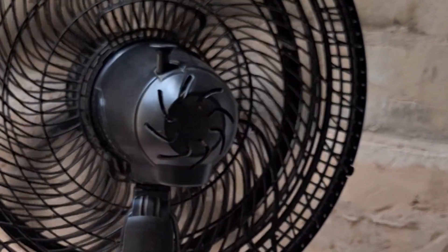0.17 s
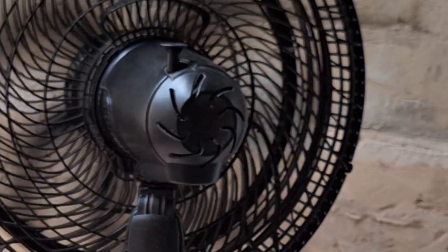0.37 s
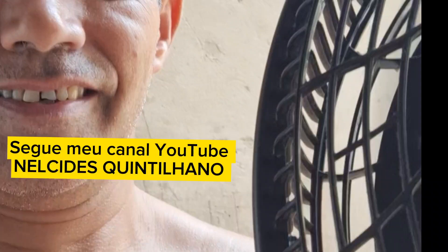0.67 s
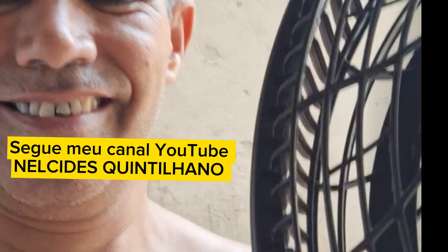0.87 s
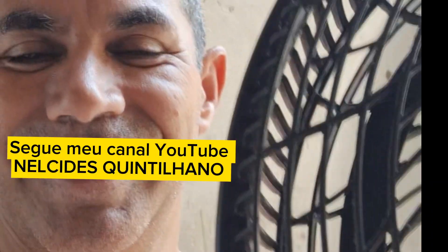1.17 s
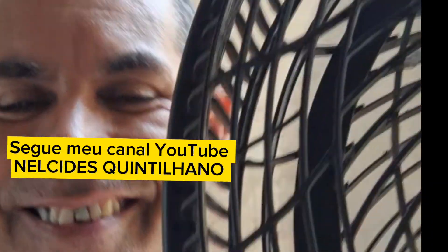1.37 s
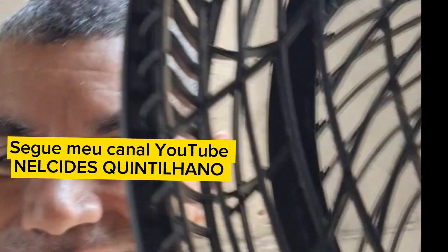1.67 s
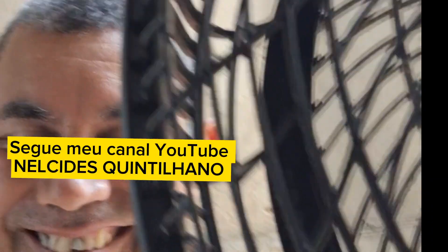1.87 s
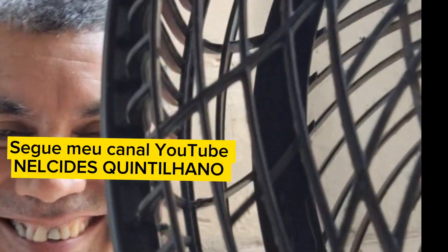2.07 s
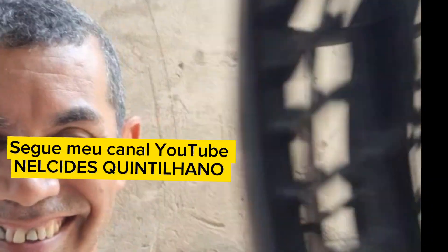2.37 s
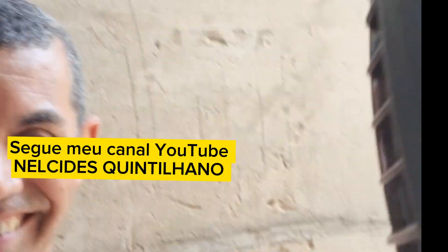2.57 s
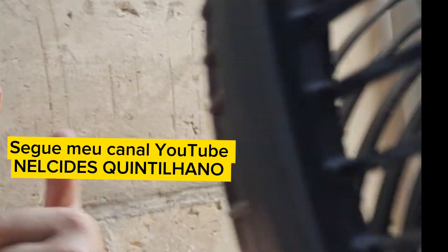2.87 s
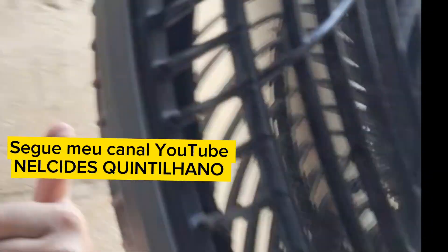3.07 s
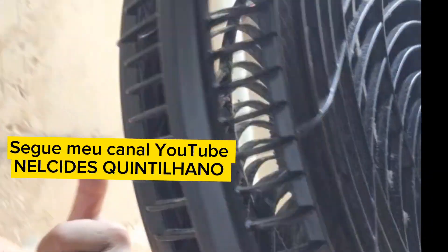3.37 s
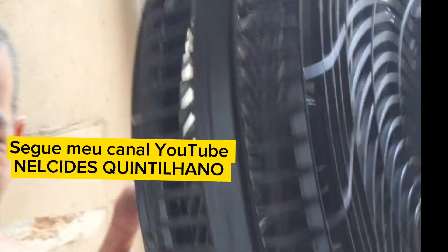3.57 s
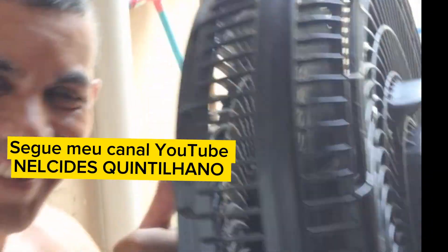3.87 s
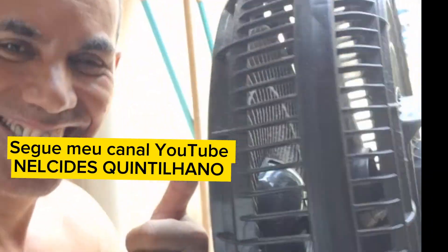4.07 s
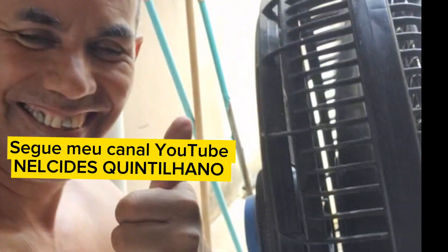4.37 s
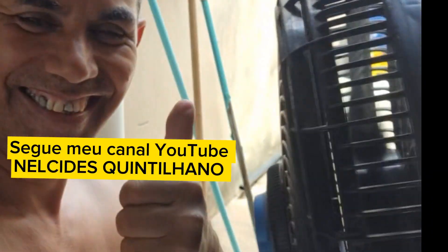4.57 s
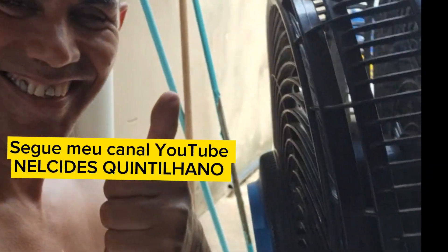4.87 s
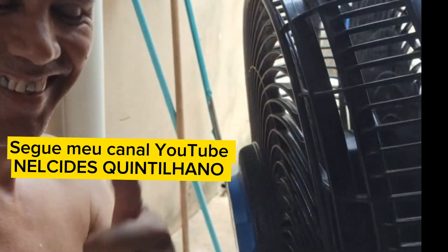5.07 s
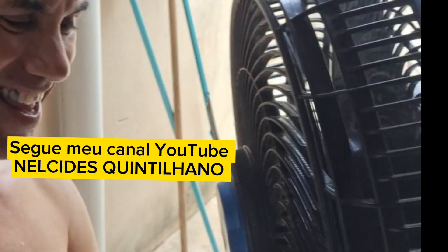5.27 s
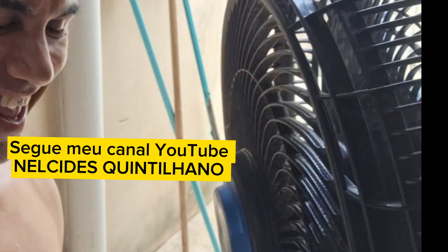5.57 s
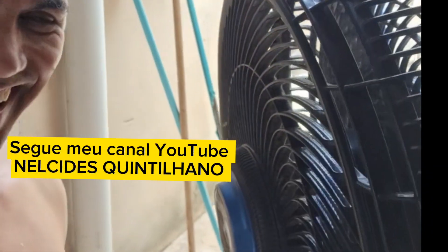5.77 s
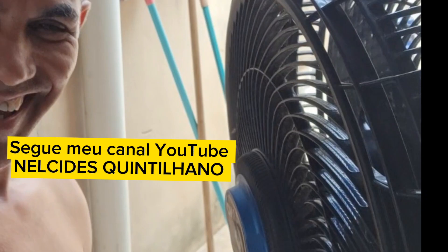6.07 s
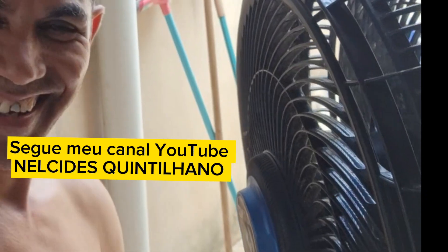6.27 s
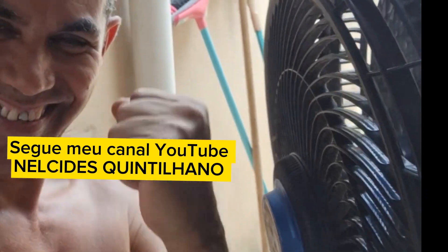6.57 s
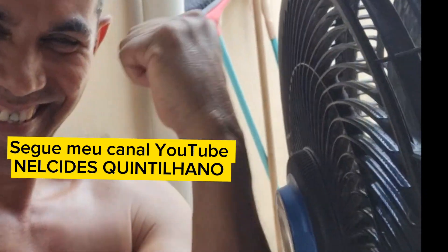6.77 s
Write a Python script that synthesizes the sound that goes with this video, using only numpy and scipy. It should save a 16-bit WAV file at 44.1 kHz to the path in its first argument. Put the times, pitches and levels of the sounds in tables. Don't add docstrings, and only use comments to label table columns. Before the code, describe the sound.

Very close to a running electric fan in a hard-walled space, handheld phone microphone. First the motor side: deep, beating hum and dull rushing air. It cuts dead at about 0.66 seconds, stays silent for a third of a second, then returns louder, with heavy low throb, wind buffeting the microphone and unsteady gain. As the cage turns toward the phone, the hum weakens and the air rush becomes more open and steady.

```python
import sys
import numpy as np
from scipy import signal
from scipy.fft import rfft, irfft, next_fast_len
from scipy.io import wavfile
from scipy.ndimage import uniform_filter1d, minimum_filter1d, map_coordinates

SR = 44100
rng = np.random.default_rng(int(sys.argv[2]) if len(sys.argv) > 2 else 0)


def gain_from_decibels(decibels):
    exponent = np.asarray(decibels, float) / 20
    return 10 ** exponent


def log_audio(samples):
    frames = np.atleast_2d(samples).T
    limited = np.clip(frames, -1, 1)
    pcm = np.round(limited * 32767).astype(np.int16)
    wavfile.write(sys.argv[1], SR, pcm)


N = 304731
CUT_S, BACK_S = 0.65784, 0.9665
SHAFT_HZ, BLADE_COUNT = 19.01, 6


def unit(x):
    return x / np.sqrt(np.mean(x ** 2) + 1e-20)


def along(points, hz):
    f, v = np.transpose(points)
    return np.interp(np.log(hz + 1), np.log(f + 1), v)


def curves(rows):
    s, *cols = np.transpose(rows)
    return [np.interp(np.arange(N) / SR, s, c) for c in cols]


def wobble(rate_hz):
    knots = rng.standard_normal(int(N * rate_hz / SR) + 4)
    return map_coordinates(knots, [np.arange(N) * rate_hz / SR])


def filtered(x, response):
    m = next_fast_len(N + 8192)
    return irfft(rfft(x, m) * response(np.fft.rfftfreq(m, 1 / SR)), m)[..., :N]


def sides(lean_db):
    return gain_from_decibels(np.array([lean_db, -lean_db]) / 2)


def blend(pair, alike):
    turn = np.arccos(np.clip(alike, -1, 1)) / 2
    return np.cos(turn) * pair[0] + np.sin(turn) * pair[1] * [[1], [-1]]


def dips(rows, fall_s, recover_s):
    coarse = np.arange(0, N, 64)
    lag_s = coarse[:, None] / SR - np.array(rows)[:, 0]
    shape = np.exp(-(lag_s / np.where(lag_s < 0, fall_s, recover_s)) ** 2)
    return np.interp(np.arange(N), coarse, -shape @ np.array(rows)[:, 1])


# t/s, grip of stand shake level/dB, level with rim [0-1], air flow level/dB,
# port buffeting level/dB
PHONE_PLACE = [(0.05, -13, 0, -35, -20), (0.62, -10, 0, -35, -20.5), (1.05, -6, 0.23, -34, -18.5),
               (1.5, -6.5, 0.31, -34.5, -18.5), (2.06, -6.5, 0.43, -36.5, -16.5),
               (2.4, -7.5, 0.69, -37, -18), (2.7, -12, 1, -39, -21.5), (3.0, -6.5, 0.74, -37, -19.5),
               (3.3, -10, 0.53, -36, -21.5), (3.6, -7, .25, -37, -23.5), (3.86, -9.5, 0.3, -36.5, -25.5),
               (4.0, -17.5, 0.15, -36.5, -25), (4.5, -23, .05, -35.5, -25), (5.25, -21.5, .05, -34, -25),
               (5.55, -16, 0, -33, -24.5), (5.9, -20, .05, -33.5, -21), (6.1, -16, 0, -33.5, -24),
               (6.7, -14.5, 0, -33, -21)]


def phone_place():
    return curves(PHONE_PLACE)


# t/s, share of front colour [0-1]
SWIVEL = [
    (3.2, 0.015),
    (4.4, 1),
]


def front_share():
    return curves(SWIVEL)[0]


# t/s, depth level/dB, half length/s
SWING_LULLS = [(0.136, 9, 0.018), (0.313, 16, 0.021), (0.405, 18, 0.021), (0.56, 12, .04),
               (1.088, 5.5, .03), (1.257, 3.5, 0.035), (1.457, 7, 0.026), (1.67, 4, .06), (1.933, 8, 0.062),
               (2.147, 3, 0.035), (2.452, 15, 0.027), (2.558, 7, 0.025), (2.744, 4, 0.036),
               (2.926, 6.5, .05), (3.071, 8.5, 0.037), (3.166, 4, .03), (3.37, 2.5, .04),
               (4.253, 10, 0.043), (4.453, 9, 0.056), (4.63, 10, 0.052), (4.835, 14, 0.047),
               (5.047, 7, .03), (5.358, 6, 0.071), (5.675, 4, 0.055), (5.95, 14, 0.051), (6.165, 11, 0.042),
               (6.286, 6, .04), (6.442, 15, 0.045), (6.654, 12, 0.043), (6.88, 13, .03)]


def lulls():
    half_s = np.array(SWING_LULLS)[:, 2]
    return dips(SWING_LULLS, half_s, half_s)


def bass_lean():
    return 1 + 8.5 * phone_place()[1] - 0.3 * front_share()


HUM_HZ, HUM_BEHIND_HZ, RIM_SAG_HZ, HUM_DRIFT_HZ = 100.64, 102.8, 5.07, 1.21
HUM_LEAD_RAD, SHAKE_DB, FRONT_SHAKE_DB = 0.22, -20, 3.5


def hum():
    grip_db, rim = phone_place()[:2]
    size = gain_from_decibels(grip_db + lulls())
    base_hz = np.where(np.arange(N) < BACK_S * SR, HUM_BEHIND_HZ, HUM_HZ)
    hz = base_hz - RIM_SAG_HZ * rim ** 4 + HUM_DRIFT_HZ * wobble(9)
    phase = 2 * np.pi * np.cumsum(hz) / SR
    phase -= phase[round(CUT_S * SR)]
    shake = np.array([wobble(25) + 1j * wobble(29) for side in (0, 1)])
    swing = 1 + gain_from_decibels(SHAKE_DB + FRONT_SHAKE_DB * front_share()) * shake
    ports = sides(bass_lean())
    ports = ports / np.sqrt(np.mean(ports ** 2, 0))
    lead = HUM_LEAD_RAD * np.array([[-0.5], [0.5]])
    return np.sqrt(2) * size * ports * (swing * np.exp(1j * (phase + lead))).real


BLADE_BEHIND_DB, BLADE_BEHIND_FADE_DB_PER_S = -15.5, 24
BLADE_DB, BLADE_GRIP, BLADE_RIM_DB = -22.5, 0.47, 11
SURGE = 0.26
# multiple of shaft speed, level/dB, left-right level/dB
ORDERS = [(3, -40, -5), (12, -33, -1.5), (18, -45, 0), (22, -32.5, 8.5), (28, -39, -2), (42, -35.5, -0.5)]


def blades():
    grip_db, rim = phone_place()[:2]
    t = np.arange(N) / SR
    behind_db = BLADE_BEHIND_DB - BLADE_BEHIND_FADE_DB_PER_S * t
    near_db = BLADE_DB + BLADE_GRIP * grip_db + BLADE_RIM_DB * rim
    db = np.where(t < BACK_S, behind_db, near_db)
    lean_db = 2.5 + 6.5 * rim
    lead_rad = -0.23 - 3 * rim
    turns = 2 * np.pi * np.cumsum(SHAFT_HZ * (1 + 0.00099 * wobble(2.256))) / SR
    turns -= turns[round(CUT_S * SR)]
    tone = np.cos(BLADE_COUNT * turns - lead_rad * [[0], [1]])
    passing = gain_from_decibels(db + 1.1 * wobble(8.1)) * sides(lean_db) * tone
    orders = np.zeros((2, N))
    surge_db = SURGE * lulls()
    for multiple, level_db, order_lean_db in ORDERS:
        gain = gain_from_decibels(level_db + surge_db + 2.0 * wobble(4.6))
        order = np.cos(round(multiple) * turns + 0.32 * wobble(4.6))
        orders += gain * sides(order_lean_db)[:, None] * order
    return np.sqrt(2) * (passing + gain_from_decibels(-12 * (1 - front_share())) * orders)


def patchy(patchy_db):
    z = signal.stft(rng.standard_normal((2, N + 512)), nperseg=512)[2]
    field = uniform_filter1d(rng.standard_normal(z.shape[1:]), size=8, axis=0)
    field = uniform_filter1d(field, size=10, axis=1)
    return signal.istft(z * gain_from_decibels(patchy_db * unit(field)), nperseg=512)[1][:, :N]


BODY_TOP_HZ, HISS_TOP_HZ = 1800, 6000


def rush(spectra, rings, alike, lean):
    hz = np.fft.rfftfreq(next_fast_len(N + 8192), 1 / SR)
    rings_db = sum(db / (1 + (2 * (hz - centre) / width) ** 2) for centre, width, db in rings)
    z = blend(rfft(patchy(patchy_db=0.5), 2 * len(hz) - 2), along(alike, hz))
    z = z * gain_from_decibels(rings_db) * sides(along(lean, hz))
    low, high = (1 / (1 + (hz / edge) ** 6) for edge in (BODY_TOP_HZ, HISS_TOP_HZ))
    bass, treble = (gain_from_decibels(along(points, hz)) for points in spectra)
    parts = bass * low, treble * (high - low), treble * (1 - high)
    bands = [irfft(z * part)[:, :N] for part in parts]
    return np.array([band / np.std(band.mean(0)) for band in bands])


OPEN_DB, DUCK_FALL_S, DUCK_RECOVER_S = 1.13, 0.022, 0.045
START_S, START_DB, START_LENGTH_S = 1.1, 2, 0.035
# t/s, depth level/dB
OVERLOADS = [(1.2, 2.5), (1.35, 3), (1.43, 4), (1.53, 2), (1.642, 3.4), (1.78, 1), (1.85, 5), (2.05, 2),
             (2.12, 2), (2.24, 3.5), (2.385, 3.2), (2.815, 3), (3.07, 2), (3.224, 2.5), (3.3, 1)]


def gain_control():
    after = np.arange(N) >= BACK_S * SR
    swell_db = -dips([(START_S, START_DB)], START_LENGTH_S, START_LENGTH_S)
    ducks_db = dips(OVERLOADS, DUCK_FALL_S, DUCK_RECOVER_S)
    return OPEN_DB * after * (1 - front_share()) + ducks_db + swell_db


BODY_DB, BODY_TURN_DB, BODY_BUFFET = 16, -0.6, 0.25
FIZZ_DB, FIZZ_RIM_DB, FIZZ_BUFFET = -14.5, 4, -0.2
CALM_DB, AIR_RIM_LEAN_DB = -22, 5
# f/Hz, level/dB
AIR_BEHIND = [
    [(88, -58.5), (150, -19), (296, -4), (414, -13), (495, -9.5), (571, -12.5), (857, -16.5), (943, -13), (1150, -19), (1630, -21), (2600, -28), (3380, -58), (5720, -120)],
    [(760, -36.5), (1300, -1.5), (1650, 2.5), (2800, -8), (3300, -16.5), (4300, -21.5), (4900, -25.5), (5400, -25), (6600, -31.5), (8000, -32), (9300, -36.5), (11500, -38), (13000, -43), (16500, -48)],
]
AIR_BESIDE = [
    [(88, -39), (150, 1.5), (242, -3), (300, -6.5), (322, -3), (483, -7.5), (525, -8.5), (667, -4), (742, -8.5), (1110, -9), (2600, -26), (3380, -59), (5720, -120)],
    [(760, -30), (1300, 1.5), (2280, -9), (3300, -20.5), (4800, -23), (6100, -31), (8300, -32.5), (9400, -38), (11300, -39.5), (13000, -45.5), (16500, -39.5)],
]
AIR_FRONT = [
    [(88, -42), (150, -5.5), (225, -4.5), (372, -8), (419, -5.5), (483, -8.5), (525, -8), (734, -7), (788, -6.5), (1590, -13.5), (2600, -34.5), (3380, -57), (5720, -120)],
    [(760, -15), (1300, -1), (2080, -7), (3300, -17.5), (5240, -25), (6860, -30.5), (8100, -29), (9400, -35), (11200, -33.5), (13000, -37), (16500, -43.5)],
]
# f/Hz, width/Hz, level/dB
CAGE_RINGS = [
    [(312, 22, 2.5), (354, 24, 5), (479, 20, 2.5), (934, 27, 5.5), (1683, 170, 4)],
    [(288, 31, 4.5), (362.5, 8.5, 1), (536, 48, 5)],
    [(221.3, 7.2, 8), (328, 30, 3), (542, 13, 5), (776, 8.3, -1)],
]
# f/Hz, correlation [-1 to 1]
AIR_ALIKE = [
    [(150, 0.83), (340, 1), (500, 0.1), (900, .3), (1500, -0.012), (3000, 0.02)],
    [(150, 0.85), (450, 0.88), (750, .68), (1100, .5), (1600, -0.096), (2200, -0.013), (3000, .03)],
    [(150, 1), (330, 0.87), (750, 0.56), (1400, 0.45), (2000, 0.5), (3000, .05)],
]
# f/Hz, level/dB
AIR_LEAN = [
    [(170, 3.5), (500, -1.5), (850, 7.5), (1400, -4), (2800, -2), (4000, 9.5), (8000, 2.5), (11000, -6.5),
     (15000, -6)],
    [(170, 2.5), (500, 2), (1400, -3.5), (4000, 0.5), (8000, -1), (11000, -7.5), (15000, 1.5)],
    [(170, 2), (500, 0.5), (1400, -1), (2800, -0.5), (5000, 1), (8000, 2), (11000, -11), (15000, 2)],
]


def air():
    rim, hiss_db, buffet_db = phone_place()[1:]
    places = AIR_BEHIND, AIR_BESIDE, AIR_FRONT
    behind, beside, front = map(rush, places, CAGE_RINGS, AIR_ALIKE, AIR_LEAN)
    share = np.clip(front_share(), 0, 1)
    body_db = BODY_DB + BODY_TURN_DB * share + BODY_BUFFET * (buffet_db - CALM_DB)
    fizz_db = FIZZ_DB + FIZZ_RIM_DB * rim + FIZZ_BUFFET * (buffet_db - CALM_DB)
    lean_db = AIR_RIM_LEAN_DB * (rim - np.mean(rim))
    pump_db = gain_control()
    t = np.arange(N) / SR
    swivelling = np.sqrt(1 - share) * beside + np.sqrt(share) * front
    body, hiss, fizz = np.where(np.arange(N) >= BACK_S * SR, swivelling, behind)
    chop = 1 + 0.054 * np.cos(2 * np.pi * BLADE_COUNT * SHAFT_HZ * t)
    body = gain_from_decibels(body_db + 0.3 * wobble(3.84)) * body
    fizz = gain_from_decibels(fizz_db + 0.5 * pump_db) * fizz * chop
    flutter = gain_from_decibels(hiss_db + pump_db + 0.31 * wobble(8) + 0.3 * wobble(25))
    return flutter * sides(lean_db) * (body + hiss * chop + fizz)


RUMBLE_SURGE, RUMBLE_ALIKE = 0.25, 0.85
# f/Hz, level/dB
RUMBLE_COLOUR = [(15, -52), (32, -6.5), (57, 5), (85, 12), (125, 7.5), (160, -5), (200, -53.5)]


def rumble():
    noise = rng.standard_normal((2, N))
    pair = unit(filtered(noise, lambda hz: gain_from_decibels(along(RUMBLE_COLOUR, hz))))
    surge_db = RUMBLE_SURGE * lulls() * front_share()
    gain = gain_from_decibels(phone_place()[3] + surge_db + 0.9 * wobble(7))
    return gain * sides(bass_lean()) * blend(pair, RUMBLE_ALIKE)


def scene():
    return hum() + blades() + air() + rumble()


def top_cut(x):
    return signal.sosfilt(signal.butter(12, 16820, fs=SR, output="sos"), x)


TOP_HZ, STEP_HZ, STEP_DB = 15750, 13000, -3.5
DITHER_S, DITHER_DB, EDIT_TOP_HZ = 0.89, -79, 16700


def record(dry):
    t = np.arange(N) / SR
    need = np.minimum(1, 1.03 / np.abs(dry).max(0).clip(1e-6))
    held = dry * uniform_filter1d(minimum_filter1d(need, size=400), size=200)
    held = filtered(held, lambda hz: (hz < TOP_HZ) * gain_from_decibels(STEP_DB * (hz > STEP_HZ)))
    fade_in = (t > BACK_S) * np.clip(0.037 + (t - BACK_S) / 0.07, 0, 1)
    gate = np.where(t < CUT_S, 1, fade_in)
    hiss = gain_from_decibels(DITHER_DB) * (t > DITHER_S) * (t < BACK_S) * rng.standard_normal(dry.shape)
    mix = filtered(held * gate + hiss, lambda hz: 1 / (1 + (hz / EDIT_TOP_HZ) ** 60))
    return top_cut(mix)


dry = scene()
out = record(dry)
log_audio(out)
```